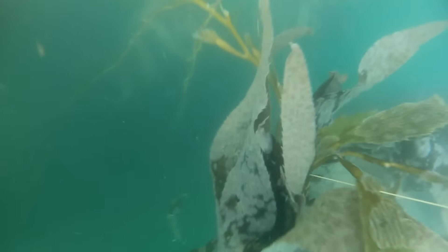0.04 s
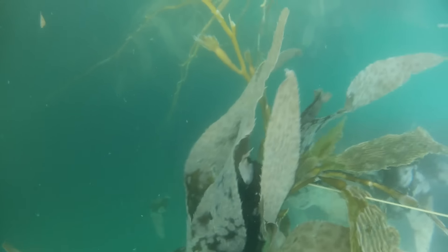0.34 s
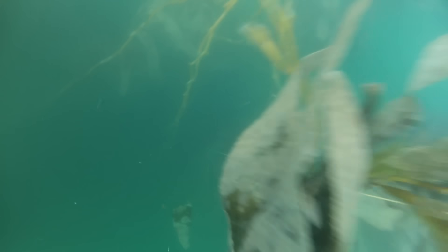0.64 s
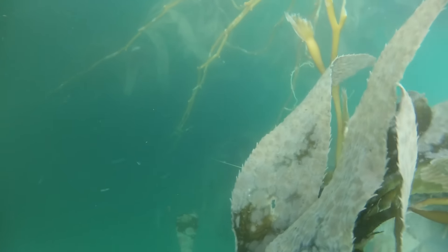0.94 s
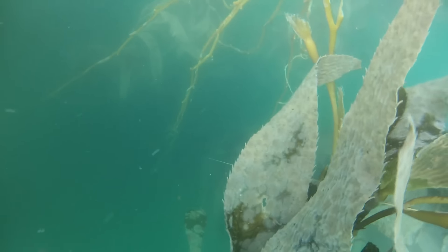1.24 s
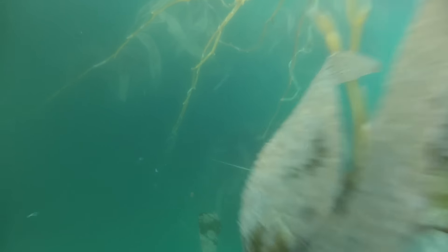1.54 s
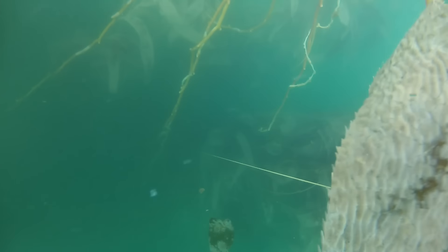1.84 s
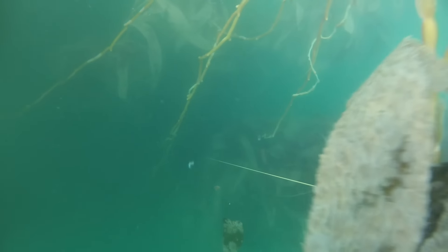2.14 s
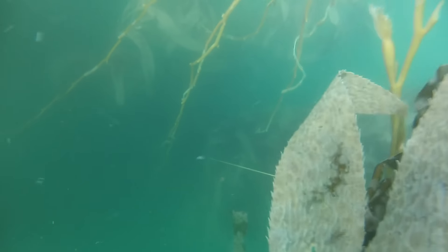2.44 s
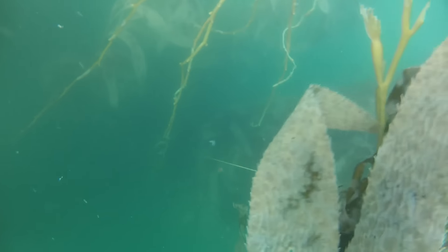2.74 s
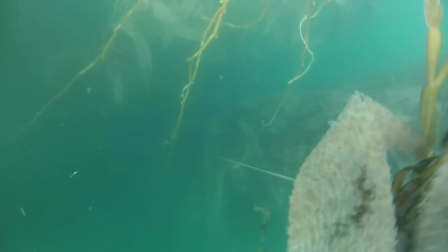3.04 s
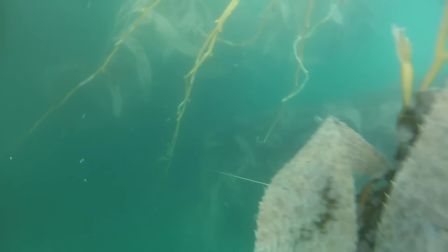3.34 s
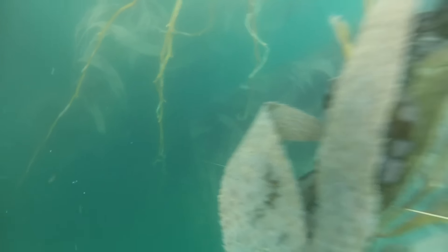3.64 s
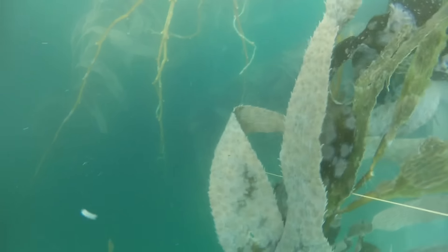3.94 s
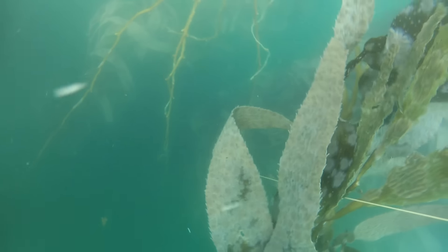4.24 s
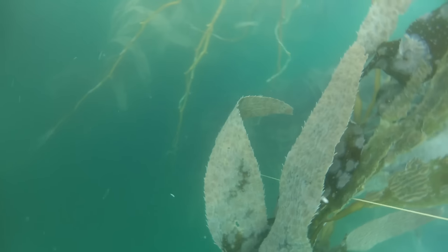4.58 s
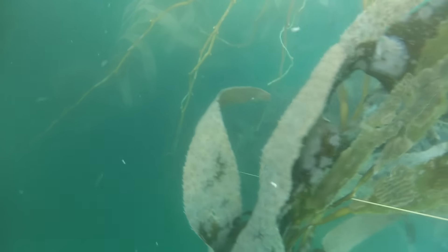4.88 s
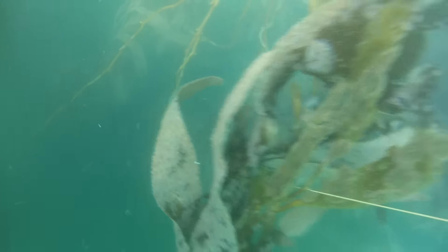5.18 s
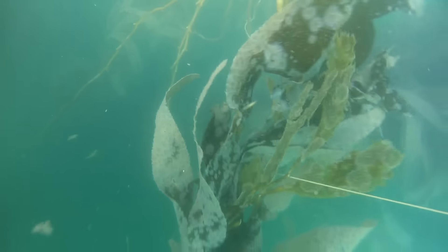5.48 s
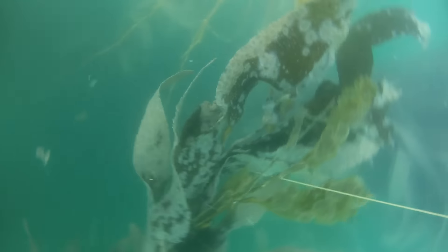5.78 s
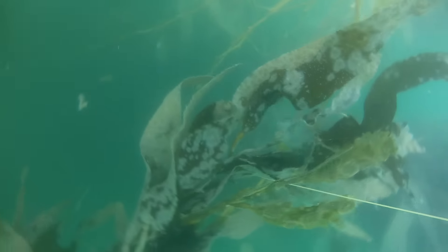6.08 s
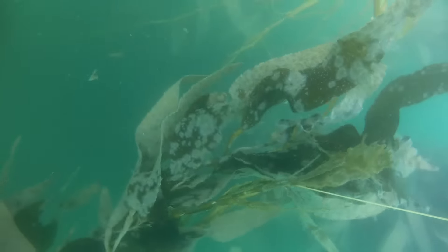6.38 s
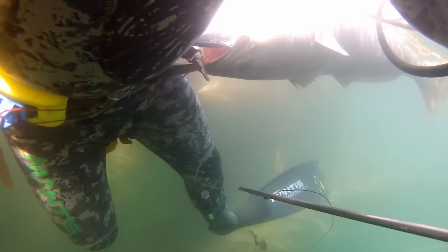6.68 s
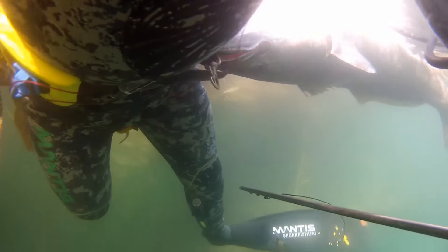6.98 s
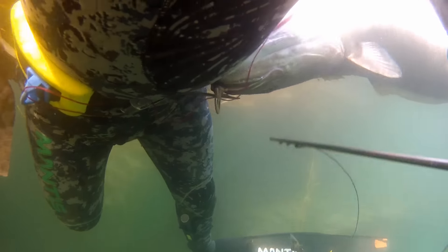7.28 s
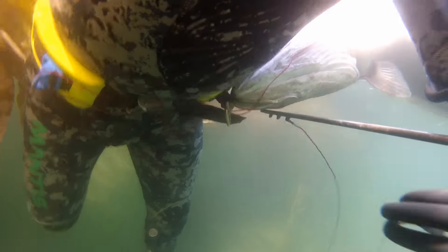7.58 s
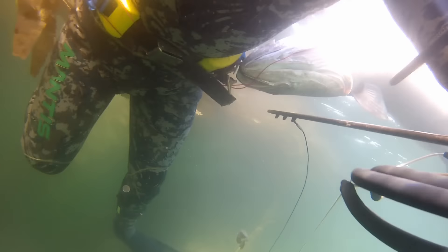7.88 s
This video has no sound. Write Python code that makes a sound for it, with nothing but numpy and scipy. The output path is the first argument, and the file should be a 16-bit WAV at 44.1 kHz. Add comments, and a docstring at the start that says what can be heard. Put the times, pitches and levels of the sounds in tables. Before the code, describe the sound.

Water buffets a diver's camera while kelp rubs and knocks against its housing, then gear scrapes and clacks on the shell.

```python
"""Water buffets a diver's camera, sealed in a plastic housing, and sets its mount droning.
As it is pushed through kelp, fronds slide, scratch and judder over the shell; stalks and gear bump it,
and gear clacks and rubs. Behind them, bubbles gurgle and pop, ticks crackle and a far line twangs.
The camera holds each sample of a slow clock, which puts a thin fizz high above everything."""
import sys
import numpy as np
from scipy import signal
from scipy.fft import rfft, irfft, next_fast_len
from scipy.io import wavfile
from scipy.ndimage import uniform_filter1d, map_coordinates

SR = 44100
rng = np.random.default_rng(int(sys.argv[2]) if len(sys.argv) > 2 else 0)


def store_wav(level_fs):
    """Save 16-bit WAV to argv[1]."""
    pcm = np.round(np.clip(np.atleast_2d(level_fs), -1, 1) * 32767)
    wavfile.write(sys.argv[1], SR, pcm.T.astype(np.int16))


N = 358091

# Fader ride of the flow against the housing: (time [s], level [dB])
FLOW_RIDE = [(0, -22.5), (.08, -22), (.2, -35.5), (.5, -15), (.72, -28), (.8, -15.5), (.93, -30),
             (1.08, -27), (1.29, -40), (1.48, -35), (1.83, -20.5), (2.06, -27.5), (2.3, -35), (2.5, -26.5),
             (3.41, -31), (3.52, -35.5), (4.12, -27), (4.45, -36), (4.75, -39.5), (5.1, -28.5), (5.55, -27),
             (5.75, -38), (6.05, -41.5), (6.9, -37.5), (7.02, -24), (7.33, -35), (7.44, -21), (7.6, -32),
             (7.88, -24.5), (8.12, -23)]
# EQ of the deep rumble: (frequency [Hz], gain [dB])
RUMBLE_EQ = [(12, -27), (22, 3), (29, 0.5), (40, -1.5), (52, -12.5), (64, -15.5), (79, -2), (92, -22.5),
             (124, -14.5), (148, -9), (175, -34), (250, -30), (400, -38), (900, -98)]
def buffeting():
    """Eddies press slowly on the housing."""
    level_db, = curves(FLOW_RIDE)
    return amp(level_db + 0.29 * wobble(2.2)) * coloured(rng.standard_normal(N), RUMBLE_EQ)


# Vortex bursts that swing the mount: (start [s], end [s], lower mode [dB], upper mode [dB])
DRONE_SWELLS = [(-0.03, 0.15, -11.5, -11.5), (0.125, 0.197, -7.5, -3), (0.466, 0.52, -21, -40),
                (0.63, 0.75, -14, -7), (0.792, 0.93, -3.5, -22.5), (0.99, 1.076, -15, -23.5),
                (1.445, 1.396, -2.5, -28.5), (1.542, 1.61, -6.5, -23), (1.653, 1.715, -9.5, -6.5),
                (2.137, 2.207, -20.5, -25), (2.341, 2.376, -18, -25), (2.48, 2.49, -35.5, -26),
                (2.586, 2.607, -23.5, -28)]
def drone():
    """Shed vortices shake the mount; its two close modes beat against each other until the flow eases."""
    def mode(hz, wander_hz):
        return np.sqrt(2) * sine(hz + wander_hz * wobble(25.2))
    lower, upper = np.zeros((2, N))
    for start, end, lower_db, upper_db in DRONE_SWELLS:
        swell = gesture(start, end, attack=0.03, release_db_per_s=155.5)
        lower = np.maximum(lower, amp(lower_db) * swell)
        upper = np.maximum(upper, amp(upper_db) * swell)
    lower_hz, upper_hz = 123, 145.7 - 17.53 * upper ** 2  # a wide swing pulls the upper mode flat
    return lower * mode(lower_hz, wander_hz=2.4) + upper * mode(upper_hz, wander_hz=2.57)


# EQ of the mount's low hum: (frequency [Hz], gain [dB])
THRUM_EQ = [(60, -24), (105, -39), (124, 5), (150, 5.5), (175, -14.5), (245, -2.5), (330, -54.5),
            (700, -63.5)]
def thrum(pressure):
    """Weak eddies stir the mount's modes at random."""
    return pressure * amp(4.6 * wobble(16)) * coloured(rng.standard_normal(N), THRUM_EQ)


# Fronds sliding over the shell: (start [s], end [s], wash [dB], scrape [dB], thrum [dB],
# pressure change from start to end [dB], attack [s], unevenness [dB])
FROND_SLIDES = [(0.0, 0.216, -18, -34, -19, -7, 0.012, 1.5), (0.268, 0.603, -33, -51.5, -35.5, 0, 0.081, 1),
                (0.609, 0.86, -21, -35.5, -27, 4.5, 0.024, 0.5),
                (0.889, 0.962, -24.5, -46.5, -24.5, 3.5, 0.022, 2),
                (1.227, 1.57, -39, -78.5, -52, 9.5, 0.02, 0.5),
                (1.611, 1.807, -22.5, -31.5, -25.5, -9.5, 0.059, 1.4),
                (1.794, 1.853, -17.5, -32.5, -24, -11, 0.046, 3.3),
                (2.378, 2.493, -35.5, -41, -29, 5, 0.042, 0.5), (2.6, 2.635, -36, -44, -27, 3, 0.038, 6.5),
                (2.935, 3.098, -26, -35, -28, 0.5, 0.056, 3),
                (3.152, 3.277, -41, -58.5, -32.5, 6, 0.015, -0.5),
                (3.522, 3.593, -30, -52, -42, -7, 0.011, 4), (3.662, 3.934, -29.5, -39, -35, -7, 0.12, -4),
                (4.705, 4.978, -37, -59, -49, -3.5, 0.073, -3.5),
                (4.982, 5.597, -29.5, -36.5, -33.5, -5, 0.19, -0.5),
                (5.675, 6.143, -51.5, -70, -67, 9.5, 0.048, 3),
                (6.162, 6.347, -34.5, -51.5, -63, -9.5, 0.095, -0.5)]
# Bed of fizz under the scrape in open water: (time [s], level [dB])
FIZZ_RIDE = [(0, -53), (1.35, -50), (1.55, -52.5), (2.8, -55), (4.5, -55), (6.6, -56), (6.8, -58),
             (8.12, -57)]
def pressures():
    """How hard water, fronds and gear press on the shell: envelopes for wash, scrape and thrum."""
    flow_db, = curves(FLOW_RIDE)
    fizz_db, = curves(FIZZ_RIDE)
    # the open-water bed follows the flow a little and flutters in small eddies
    calm = amp(0.092 * (flow_db - flow_db.mean()) - 2.5 * wobble(19))
    push, slip, stir = np.zeros((3, N))
    catching = wobble(45)
    for start, end, wash_db, scrape_db, thrum_db, change_db, attack, uneven_db in FROND_SLIDES:
        slide = gesture(start, end, attack, release_db_per_s=304, change_db=change_db)
        slide *= amp(uneven_db * catching)
        push += amp(wash_db) * slide
        slip += amp(scrape_db) * slide
        stir += amp(thrum_db) * slide
    gear = sum(amp(db) * window(start, end, fade=0.024) for start, end, _, db in GEAR_RUBS)
    return (np.hypot(push + gear, amp(-44.5) * calm),
            np.hypot(slip, amp(fizz_db)),
            np.hypot(stir + amp(-5) * gear, amp(-47.5) * calm))


# EQ of a slide's hollow body: (frequency [Hz], gain [dB])
WASH_EQ = [(60, -16.5), (130, 3), (190, -18), (250, 3.5), (290, -1.5), (350, -9), (430, 4.5), (560, 3),
           (680, 0), (740, -13.5), (815, -8.5), (905, -25), (1100, -13), (1350, -41.5), (6000, -62)]
def wash(pressure):
    """Lumpy rubbing, heard through the hollow low resonances of the shell."""
    return pressure * shifting(coloured(grains(rate=2000, spread_db=0), WASH_EQ), patch_db=3)


# EQ of a slide's bright edge: (frequency [Hz], gain [dB])
SCRAPE_EQ = [(300, -6.5), (900, -27.5), (1000, -4.5), (1050, -8.5), (1120, 1.5), (1290, -11.5), (1400, -4),
             (1510, -1), (1620, -7.5), (1720, -11), (1830, -6), (1910, 3), (2030, 0), (2150, 4.5),
             (2270, 1), (2400, -4), (2560, -10.5), (2730, -15.5), (2970, -14.5), (3120, -16.5),
             (3400, -10.5), (3560, -5), (3800, -15), (4100, -29), (4400, -22.5), (4950, -17.5), (6000, -37)]
def scrape(pressure):
    """Dense fine slips of kelp blades reach the higher resonances of the shell."""
    return pressure * shifting(coloured(grains(rate=6000, spread_db=-0.5), SCRAPE_EQ), patch_db=3)


# Stick-slip creaks on the shell: (start [s], end [s], slip rate [Hz], level [dB])
STALK_JUDDERS = [(0.01, 0.18, 145, -19.5), (0.636, 0.733, 131, -14.5), (1.611, 1.718, 136, -13.5)]
# EQ of the creak: (frequency [Hz], gain [dB])
JUDDER_EQ = [(150, -44), (270, 2.5), (345, -6.5), (430, 1.5), (570, 0.5), (620, -9), (680, 3), (740, -9),
             (820, -1.5), (950, -35), (1110, -16), (1280, -41.5), (1480, -16), (1750, -26.5), (2180, -11),
             (2700, -40), (6000, -63.5)]
def judder():
    """A stalk sticks and slips unevenly, at about the rate the mount swings."""
    track = np.zeros(N)
    for start, end, hz, db in STALK_JUDDERS:
        swings = np.floor(np.cumsum(hz + 4 * wobble(50)) / SR + 0.0044 * wobble(200))
        slips = np.diff(swings, prepend=0) * amp(3.2 * wobble(140))
        friction = unit(slips) + 0.99 * rng.standard_normal(N)
        track += amp(db) * window(start, end, fade=0.053) * coloured(friction, JUDDER_EQ)
    return track


# Ringing modes of the housing: (frequency [Hz], level [dB], t60 at damping 1 [s])
SHELL_MODES = [(173.8, -2.5, 0.082), (244.5, -9, 0.11), (318, -10, 0.13), (461.4, -0.5, 0.063),
               (548.8, -0.5, 0.072), (645, -6, 0.071), (686, -16.5, 0.038), (824, -23, 0.065),
               (1020, -14.5, 0.044), (1060, -15.5, 0.022), (1600, -14, 0.007), (2370, -10.5, 0.019),
               (2750, -28.5, 0.0089), (3720, -23.5, 0.0088), (3700, -3.5, 0.0067), (5240, 6.5, 0.0024)]
def strike(contact, vary_db, rattle, rattle_t60, spread, damping):
    """One chattering blow on the shell, peak 1; contact is the force's spectrum."""
    t = np.arange(SR // 5) / SR
    hz, db, t60 = np.transpose(SHELL_MODES)[:, :, None]
    mode_db = db + vary_db * rng.standard_normal(hz.shape) - 60 * damping * t / t60
    ring = np.sum(amp(mode_db) * np.sin(2 * np.pi * hz * t), axis=0)
    chatter = rng.standard_normal(len(t)) * amp(-60 * t / rattle_t60)
    roughness = 1 + rattle * rfft(chatter / np.linalg.norm(chatter))
    f = np.fft.rfftfreq(len(t), 1 / SR)
    # bending waves carry the treble fastest; spread is the delay at 1 kHz in seconds
    travel = np.exp(-4j * np.pi * spread * np.sqrt(1000 * f))
    blow = irfft(rfft(ring) * roughness * contact(f) * travel)[:SR // 8]
    return blow / np.abs(blow).max()


# Soft bumps, from stalks and from gear rebounding after a clack: (time [s], peak [dB], centre [Hz])
SOFT_BUMPS = [(0.407, -10.5, 397), (0.444, -10, 430), (0.476, -9, 320), (0.588, -13, 500), (0.634, -6, 658),
              (1.035, -17, 435.7), (2.044, -41, 412), (2.141, -30, 300), (2.175, -19, 272),
              (2.359, -24, 224.7), (2.481, -14, 513), (2.567, -22, 740), (2.629, -16.5, 800),
              (2.637, -11, 590), (2.814, -13, 406), (2.826, -23, 415), (2.943, -15, 430), (3.11, -12, 603),
              (3.165, -12, 480), (3.436, -33, 500), (3.573, -17, 447), (3.925, -15.5, 650),
              (3.968, -15.5, 293), (4.017, -25.5, 390), (4.214, -13, 435), (5.611, -8.5, 450),
              (6.247, -21.5, 480), (6.571, -27.5, 450), (6.644, -29, 447), (7.169, -14, 330),
              (7.231, -8, 430)]
def knocks():
    """A soft contact rings the housing in a narrow band."""
    track = np.zeros(N)
    for s, db, centre_hz in SOFT_BUMPS:
        soft = lambda f: f / (f + .7 * centre_hz) / (1 + (f / (1.5 * centre_hz)) ** 4)
        bump = strike(soft, vary_db=2.5, rattle=1.6, rattle_t60=0.052, spread=0.002576, damping=1)
        add(track, s - .002, amp(db) * bump)
    return track


# Hard gear hits, layer by layer: (time [s], crack [dB], contact cut-off [Hz], ping [dB],
# ping pitch [Hz], boom [dB], boom pitch [Hz], thud [dB])
GEAR_CLACKS = [(7.1559, -8, 2100, -25, 1970, -1.5, 612, -6),
               (7.2228, -13.5, 1554, -25.5, 2250, 1.5, 527, -25),
               (7.2583, -7, 3700, -16.5, 3550, 2.5, 550, -28.5), (7.5423, -2, 4130, -5, 3550, 5.5, 547, 3),
               (7.7264, -6, 3900, -11.5, 3590, -1, 534, -13)]
def clacks():
    """Gear cracks and pings on the shell; then the housing booms and the camera thuds on its mount."""
    track = np.zeros(N)
    thud = damped_mode(hz=200, rise=0.0027)
    low_cut_hz = 800  # the crack is too brief to push much below this
    for s, crack_db, contact_hz, ping_db, ping_hz, boom_db, boom_hz, thud_db in GEAR_CLACKS:
        hard = lambda f: f ** 2 / (f ** 2 + low_cut_hz ** 2) / np.sqrt(1 + (f / contact_hz) ** 12)
        crack = strike(hard, vary_db=4.5, rattle=0.44, rattle_t60=0.043, spread=0.00347, damping=1.11)
        boom = damped_mode(boom_hz, rise=0.0023)
        add(track, s - .0017, amp(crack_db) * crack)
        add(track, s, amp(ping_db) * damped_mode(ping_hz, rise=0.00077))
        add(track, s + .0021, amp(boom_db) * boom + amp(thud_db) * thud)  # slow, low waves come last
    add(track, 6.990, amp(-3.5) * thud)  # a padded blow only thuds
    # a steel part rings on after one blow
    steel_hz, steel_t60 = 1459, .3
    t = np.arange(SR // 2) / SR
    add(track, 7.262, amp(-41 - 60 * t / steel_t60) * np.sin(2 * np.pi * steel_hz * t))
    return track


# Gear dragging on the housing: (start [s], end [s], grit [dB], wash [dB])
GEAR_RUBS = [(6.76, 6.79, -41.5, -57), (6.823, 6.859, -42.5, -28.5), (6.923, 7.108, -37.5, -28.5),
             (6.965, 7.019, -32.5, -36), (7.124, 7.27, -42.5, -34), (7.365, 7.423, -37.5, -24.5),
             (7.428, 7.457, -42.5, -37), (7.483, 7.551, -37.5, -34), (7.67, 7.683, -49.5, -30),
             (7.8, 8.107, -64, -34.5)]
# EQ of the grit: (frequency [Hz], gain [dB])
RUB_EQ = [(200, 3), (700, 4), (1000, -2), (1500, -5.5), (2200, 0.5), (2800, -10), (3600, -6), (4200, -23),
          (6000, -30.5)]
def rubs():
    """Harder gear gives a grittier scrape than kelp."""
    pressure = sum(amp(db) * window(start, end, fade=0.019) for start, end, db, _ in GEAR_RUBS)
    grit = amp(2.2 * wobble(70)) * grains(rate=3000, spread_db=2)
    return pressure * coloured(grit, RUB_EQ)


# Single ringing plops: a low thump from a blow, then two bubbles: (time [s], level [dB], pitch [Hz])
RINGING_PLOPS = [(3.113, -10, 248), (3.173, -13.5, 445), (3.25, -20.5, 453)]
def plops():
    """A thump or a bubble rings briefly at one pitch."""
    attack_s, t60 = 0.0069, 0.12
    t = np.arange(SR // 5) / SR
    envelope = (1 - np.exp(-t / attack_s)) * amp(-60 * t / t60)
    track = np.zeros(N)
    for s, db, hz in RINGING_PLOPS:
        add(track, s, amp(db) * envelope * np.sin(2 * np.pi * hz * t))
    return track


# Gurgle cues: (start [s], end [s], pitch [Hz], level [dB])
HOLLOW_GURGLES = [(3.035, 3.113, 543, -20), (3.858, 3.953, 620, -27.5), (4.598, 4.585, 583, -30),
                  (4.768, 4.939, 641, -37), (4.998, 5.01, 610, -24.5), (7.962, 7.979, 532.4, -20)]
def gurgles():
    """Water in a hollow sounds one narrow, fluttering resonance."""
    track = np.zeros(N)
    waver_hz, flutter = 38 * wobble(110), amp(3.5 * wobble(90))
    for start, end, hz, db in HOLLOW_GURGLES:
        track += amp(db) * window(start, end, fade=0.079) * unit(sine(hz + waver_hz) * flutter)
    return track


# Kelp edges scratching the shell: (start [s], end [s], level [dB])
BLADE_SCRATCHES = [(0.039, 0.08, -34), (0.68, 0.745, -39), (0.891, 0.957, -35.5), (1.699, 1.729, -44.5),
                   (2.061, 2.112, -51.5), (2.338, 2.365, -47), (2.45, 2.519, -55.5), (2.63, 2.66, -57.5),
                   (3.094, 3.115, -54.5), (3.795, 3.84, -45), (5.622, 5.663, -48.5)]
# EQ of the rasp: (frequency [Hz], gain [dB])
SCRATCH_EQ = [(600, -20), (2100, 6), (2800, -8), (3600, 3), (4200, -5), (5000, -6.5), (6000, -42)]
def scratches():
    """A blade's tiny teeth catch one after another in a short, bright rasp."""
    pressure = sum(amp(db) * window(start, end, fade=0.023) for start, end, db in BLADE_SCRATCHES)
    return pressure * coloured(grains(rate=3100, spread_db=-1), SCRATCH_EQ)


# Sharp ticks, some of them overload clicks in the loudest surges: (time [s], peak [dB], centre [Hz])
SHARP_TICKS = [(0.367, -38.5, 3500), (0.6265, -29, 2170), (0.675, -28, 2130), (0.721, -31, 3800),
               (1.403, -37.5, 2020), (1.604, -26, 2220), (1.712, -29.5, 3300), (2.27, -34.5, 2900),
               (2.93, -32.5, 2600), (2.656, -32, 2200), (3.107, -39.5, 2240), (3.165, -31, 1140),
               (3.437, -39.5, 2400), (3.8115, -32.5, 2700), (4.125, -40.5, 2200), (4.3445, -35.5, 2150),
               (4.455, -48.5, 4000), (5.8163, -38.5, 4000), (5.978, -45, 3800), (6.7612, -47.5, 3000),
               (7.454, -27, 2400)]
def ticks():
    """Brief, dry ticks stand out of a bed of faint, clustered crackle."""
    t = np.arange(SR // 20) / SR
    burst = lambda: (1 - np.exp(-t / .001)) * amp(-60 * t / .03) * rng.standard_normal(len(t))
    clusters = amp(1.5 * wobble(5.0)) * grains(rate=320, spread_db=1)
    bed = amp(-58) * unit(signal.fftconvolve(clusters, burst())[:N])
    track = filtered(bed, lambda hz: hz ** 2 / (hz ** 2 + 1500 ** 2) / (1 + (hz / 4200) ** 4))
    for s, db, hz in SHARP_TICKS:
        tick = signal.lfilter(*signal.butter(2, [hz / 1.3, hz * 1.3], "bandpass", fs=SR), burst())
        add(track, s - .001, amp(db) * tick / np.abs(tick).max())
    return track


def pops(pressure):
    """Tiny bubbles burst wherever water fizzes or a frond slides, each a few cycles at its own pitch."""
    per_second, centre_hz, range_octaves, rise_cycles = 70, 1586, 2.014, 2.43
    track = np.zeros(N)
    for when, faintness, pitch in rng.random((round(per_second * N / SR), 3)):
        hz = centre_hz * 2 ** (range_octaves * (pitch - .5))
        db = -3 - 2.6 * np.log(max(faintness, .04))  # many quiet, a few loud
        add(track, when * N / SR, pressure[int(when * N)] * amp(db) * damped_mode(hz, rise_cycles / hz))
    return track


# Distant twangs: (time [s], level [dB], start pitch [Hz], end pitch [Hz], length [s])
LINE_TWANGS = [(4.332, -46, 2500, 800, .075), (4.672, -51, 2200, 1250, .025)]
def twangs():
    """A burst of ticks spreads out along a taut line and arrives as a rough falling chirp."""
    track = np.zeros(N)
    for s, db, start_hz, end_hz, length in LINE_TWANGS:
        hz = np.linspace(start_hz ** -.5, end_hz ** -.5, round(length * SR)) ** -2
        flutter = wobble(600)[:len(hz)] * signal.windows.tukey(len(hz), .3)
        add(track, s, amp(db) * flutter * sine(hz))
    return track


def shifting(x, patch_db):
    """The point of contact wanders, so that now one resonance stands out and now another."""
    spectrogram = signal.stft(x, nperseg=1024)[2]
    patches = uniform_filter1d(rng.standard_normal(spectrogram.shape), size=4, axis=0)
    patches = unit(uniform_filter1d(patches, size=4, axis=1))
    return unit(signal.istft(spectrogram * amp(patch_db * patches), nperseg=1024)[1][:N])


def damped_mode(hz, rise):
    """A few swings of a mode that the water damps heavily, at their widest after rise seconds."""
    t = np.arange(SR // 10) / SR
    return (t / rise * np.exp(1 - t / rise)) ** 2 * np.sin(2 * np.pi * hz * t)


def gesture(start, end, attack, release_db_per_s, change_db=0):
    """Swell, hold while the pressure drifts by change_db, then die away within half a second."""
    first, last = np.clip([round(start * SR), round((end + .5) * SR)], 0, N)
    t = np.arange(first, last) / SR
    drift_db = change_db * (np.clip((t - start) / (end - start), 0, 1) - .5)
    release_db = release_db_per_s * np.maximum(t - end, 0)
    gain = np.clip((t - start) / attack, 0, 1) * amp(drift_db - release_db)
    return np.pad(gain, (first, N - last))


def window(start, end, fade):
    """A gate with fades centred on its two times."""
    t = np.arange(N) / SR
    return np.clip(np.minimum(t - start, end - t) / fade + .5, 0, 1)


def grains(rate, spread_db):
    """Random tiny clicks of uneven size, rate a second."""
    clicks = (rng.random(N) < rate / SR) * rng.standard_normal(N)
    return unit(clicks * amp(spread_db * rng.standard_normal(N)))


def wobble(rate):
    """A smooth random curve, rate knots a second."""
    return map_coordinates(rng.standard_normal(int(N * rate / SR) + 4), [np.arange(N) * rate / SR])


def sine(hz):
    """A tone that follows a pitch curve."""
    return np.sin(2 * np.pi * np.cumsum(hz) / SR)


def curves(rows):
    """One value per sample for each column after the time."""
    s, *cols = np.transpose(rows)
    return [np.interp(np.arange(N) / SR, s, c) for c in cols]


def filtered(x, response):
    """x times a response of frequency."""
    size = next_fast_len(N + 8192)
    return irfft(rfft(x, size) * response(np.fft.rfftfreq(size, 1 / SR)), size)[..., :N]


def coloured(x, eq):
    """x through an EQ curve, at rms 1."""
    f, db = np.transpose(eq)
    return unit(filtered(x, lambda hz: amp(np.interp(np.log(hz + 1), np.log(f), db))))


def amp(db):
    """Decibels to gain."""
    return 10 ** (np.asarray(db) / 20)


def unit(x):
    """Scale to rms 1."""
    return x / np.sqrt(np.mean(x ** 2) + 1e-20)


def add(track, s, sound):
    """Mix a sound in at time s."""
    part = track[round(s * SR):][:len(sound)]
    part += sound[:len(part)]


def scene():
    """The shell carries one sound to both microphones; the right one hears a little more treble."""
    push, slip, stir = pressures()
    water = buffeting() + drone() + thrum(stir) + wash(push) + gurgles() + plops()
    friction = scrape(slip) + scratches() + judder() + rubs()
    transients = knocks() + clacks() + twangs() + ticks() + pops(slip)
    shell = water + friction + transients
    side = filtered(shell, lambda hz: .07 * hz ** 2 / (hz ** 2 + 750 ** 2))
    return np.array([shell - side, shell + side])


def record(dry):
    """The input saturates, samples are held between ticks, the sound drops out once, the top is cut."""
    clock_hz, top_hz = 12000, 15000
    slow = signal.resample_poly(dry, clock_hz, SR, axis=1)
    saturated = .96 * slow / (1 + np.abs(slow) ** 8) ** (1 / 8)
    held = signal.resample_poly(np.repeat(saturated, 4, axis=1), SR, 4 * clock_hz, axis=1)[:, :N]
    t = np.arange(N) / SR
    dropout_gate = (t < 8.002) | (t > 8.023)
    return filtered(held * dropout_gate, lambda hz: hz < top_hz)


dry = scene()
out = record(dry)
store_wav(out)
```